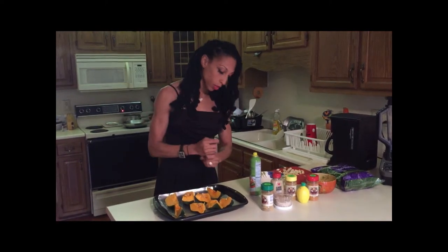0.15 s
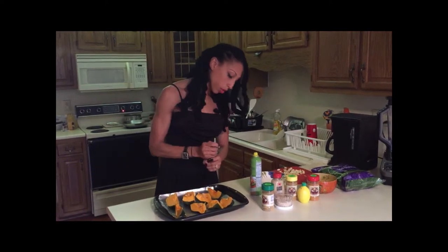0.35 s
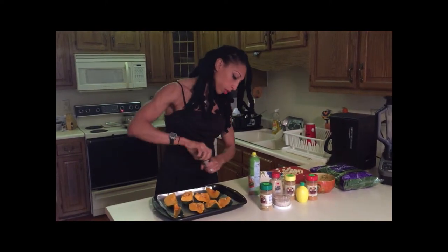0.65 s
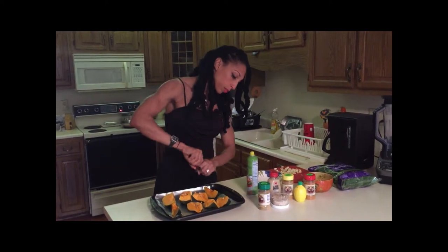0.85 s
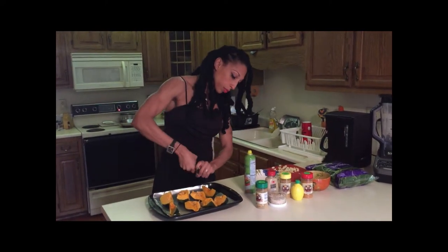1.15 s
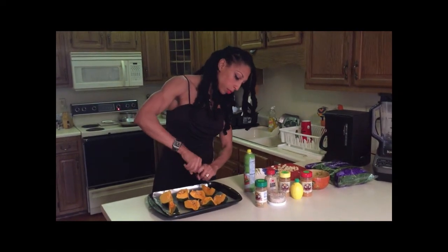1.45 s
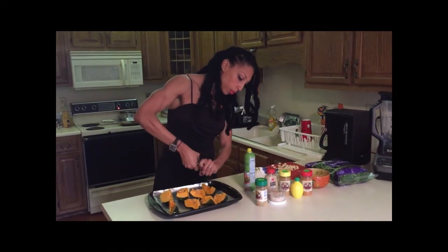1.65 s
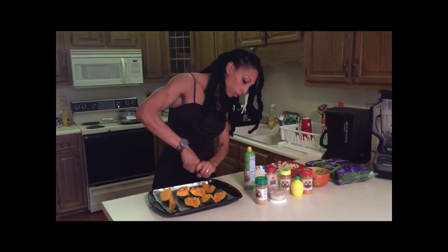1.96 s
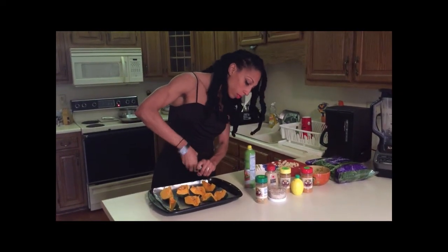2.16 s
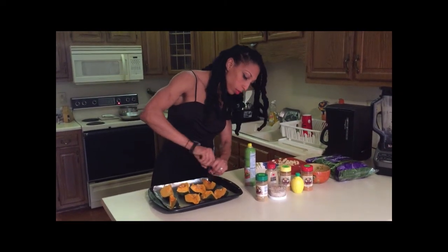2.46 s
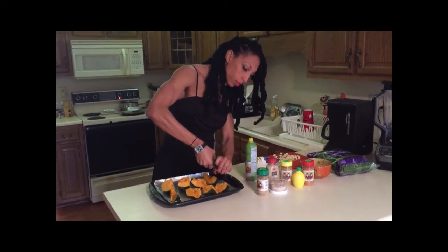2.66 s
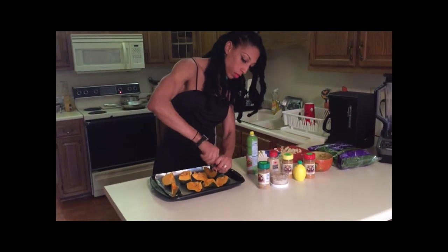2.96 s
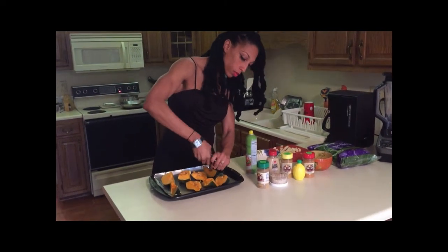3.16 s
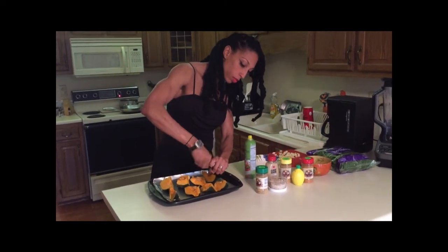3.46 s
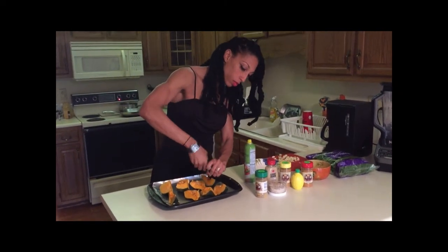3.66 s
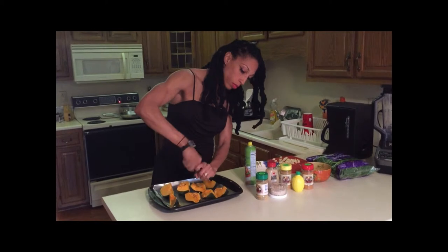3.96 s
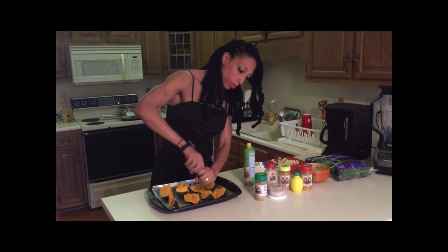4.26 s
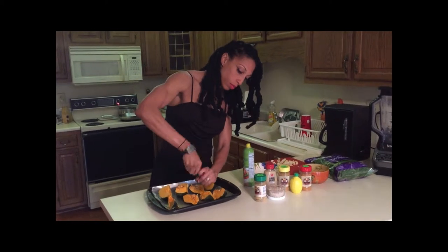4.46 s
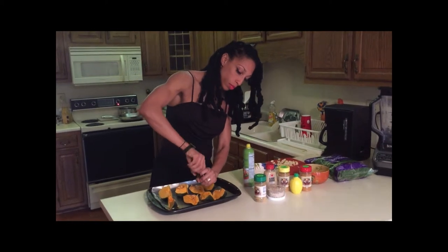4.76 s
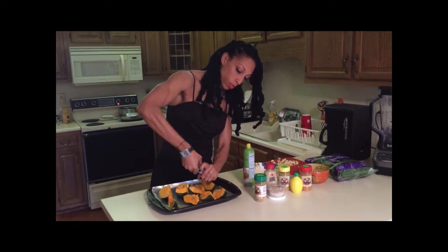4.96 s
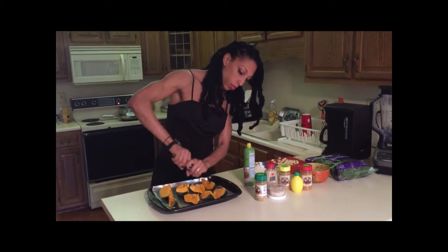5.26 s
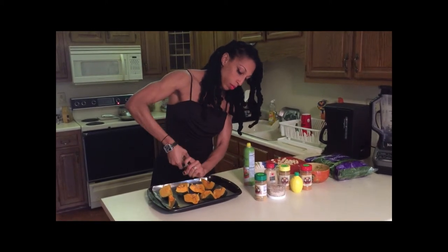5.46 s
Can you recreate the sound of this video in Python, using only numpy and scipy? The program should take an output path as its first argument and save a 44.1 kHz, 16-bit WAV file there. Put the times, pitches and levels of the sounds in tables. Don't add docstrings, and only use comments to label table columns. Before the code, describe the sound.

In a home kitchen, quiet room air and a low fridge hum come first, with faint crumb ticks and a small crackle. From about one second a pepper mill is twisted in regular jerks, each a sharp, hollow, gritty crunch. Light ticks and slips fill the gaps. The camera microphone is a couple of metres away, catching short reflections from hard surfaces.

```python
import sys
import numpy as np
from scipy import signal
from scipy.fft import rfft, irfft
from scipy.io import wavfile
from scipy.ndimage import uniform_filter1d

SR = 44100
rng = np.random.default_rng(int(sys.argv[2]) if len(sys.argv) > 2 else 0)


def to_wav(sig):
    pcm = np.clip(np.atleast_2d(sig), -1, 1) * 32767
    pcm = np.round(pcm).astype(np.int16)
    wavfile.write(sys.argv[1], SR, pcm.T)


def volts_from_decibels(level):
    exponent = np.asarray(level, float) / 20
    return 10 ** exponent


N = 246911
TIME = np.arange(N) / SR


def set_rms(x, db):
    return x * volts_from_decibels(db) / np.sqrt(np.mean(x ** 2))


def unit_energy(x):
    return x / np.sqrt(np.sum(x ** 2, axis=-1, keepdims=True))


def on_log_axis(table, hz):
    table_hz, value = np.transpose(table)
    return np.interp(np.log(np.maximum(hz, 1)), np.log(table_hz), value)


def resonance(x, hz, width_hz):
    return signal.lfilter(*signal.iirpeak(hz, hz / width_hz, fs=SR), x)


def low_cut(x, hz, order):
    return signal.sosfilt(signal.butter(order, hz, "high", fs=SR, output="sos"), x)


# frequency in Hz, level in dB per Hz before scaling.
AIR_COLOUR = [(30, -12.5), (55, -4), (100, -13.5), (250, -10), (600, -20), (1080, -24), (1900, -27),
              (15000, -40.5)]
# frequency in Hz, width in Hz, level in dB.
FRIDGE_LINES = [(112, 4, -78.5), (157.5, 18, -72), (237.6, 9.6, -81), (361.6, 32, -76), (1052, 120, -75.5)]


def air():
    hz = np.arange(N // 2 + 1) * SR / N
    colour = volts_from_decibels(on_log_axis(AIR_COLOUR, hz))
    hiss = set_rms(irfft(rfft(rng.standard_normal(N)) * colour, N), -67.5)
    treble = low_cut(hiss, 450, order=2)
    rumble = hiss - treble
    for line_hz, width_hz, db in FRIDGE_LINES:
        rumble = rumble + set_rms(resonance(rng.standard_normal(N), line_hz, width_hz), db)
    swell = set_rms(resonance(rng.standard_normal(N), 4, 6), 0)
    draught_db = 1.8
    motor = set_rms(np.sin(2 * np.pi * 238.7 * TIME), -73)
    return treble + rumble * volts_from_decibels(draught_db * swell) + motor


# start in seconds, pitch factor of the hollow,
# pitch factor of the shell, level of the tooth tips in dB as the mouth points to or from the microphone.
GRIPS = [(0, 1.046, 0.92, 1.7), (.8, 1.01, 0.99, 0), (1.55, 0.95, 1.065, -0.5), (1.95, 1.003, 0.96, -0.8),
         (2.55, 1.027, 1.064, .1), (3.08, 1.035, .98, -3), (3.5, 1.037, 1, -3.5), (4.05, 1.022, 1.006, 1),
         (4.55, 1.025, 1, -1.5), (5.0, 1.02, 1.01, 0.7), (5.46, 1.04, 0.95, -0.9)]


def grip_at(s):
    return max(np.searchsorted(np.transpose(GRIPS)[0], s) - 1, 0)


# frequency in Hz, width in Hz, level in dB.
WALL_MODES = [(947, 790, -2), (1200, 240, 0)]
HOLLOW_MODES = [(1880, 61, 0.5), (2056, 84, -2.5), (2244, 450, 1), (2504, 600, -3)]
SHELL_MODES = [(3380, 280, -11), (3674, 490, -0.5), (4020, 420, -6), (4310, 380, -8.5)]
BURR_MODES = [(6450, 540, -2.5), (6940, 900, -3.5), (8070, 1400, -5.5)]
TEETH_MODES = [(9830, 1200, 0), (11180, 1600, 0.0019), (13400, 2500, 0.015)]
CORNERS = [760, 1640, 2600, 5300, 8600]
WALL, HOLLOW, SHELL, BURR, TEETH = range(5)
STILL = np.zeros(8)


def ring(part, chance, tune=(1, 1)):
    detune, balance_db = 0.03, 2.0
    t = np.arange(512) / SR
    modes = (WALL_MODES, HOLLOW_MODES, SHELL_MODES, BURR_MODES, TEETH_MODES)[part]
    hz, width, db = np.transpose(modes)[:, :, None]
    count = len(hz)
    pitch = (1, *tune, 1, 1)[part]
    hz = hz * pitch * (1 + detune * chance[:count, None])
    size = volts_from_decibels(db + balance_db * chance[count:2 * count, None]) * np.sqrt(width)
    sound = np.sum(size * np.exp(-np.pi * width * t) * np.sin(2 * np.pi * hz * t), axis=0)
    return unit_energy(low_cut(sound, CORNERS[part] * pitch, order=3 if part == WALL else 6))


# start in seconds, level at the burr in dB, shell over burr in dB.
CRUMB_TICKS = [(0.0964, -67.5, -1), (.2813, -69, -14), (1.3657, -62, -10), (1.398, -51.5, -9),
               (1.472, -56.5, -11.5), (1.63, -62, 6.5), (1.8753, -52.5, -4), (1.9923, -51, -15),
               (1.9973, -46.5, -21), (2.4179, -52, -23.5), (2.4283, -53.5, -12), (2.4363, -56.5, -1.5),
               (2.4757, -52, -18), (2.8693, -49.5, -16), (2.975, -63, -14), (2.9792, -64.5, -13),
               (3.037, -63, -16), (3.1103, -63, 11), (3.3293, -64, 13), (3.4922, -63.5, -12),
               (3.585, -71, 10), (3.808, -54, 0), (4.5052, -66.5, -9), (4.587, -61, 9.5),
               (4.8265, -54, -11.5), (4.9651, -68, -20.5), (5.2554, -57, -5.5), (5.275, -69, -11.5),
               (5.4068, -66, -14.5), (5.44, -56.5, -23.5)]
# start in seconds, level in dB, # depth in dB (deep in the
MORE_BREAKS = [(0.2975, -51.5, -1), (0.328, -56.5, -15), (.4102, -48, -2), (1.0748, -50, -17),
               (1.0951, -32, -1.5), (1.1619, -41, 11), (1.186, -35.5, 4), (1.1934, -40, -12),
               (1.6681, -29, -0.5), (1.6917, -56, -4), (2.0816, -46, -4), (2.0956, -40.5, -2),
               (2.1598, -41, -1), (2.1855, -38, 1.5), (2.6614, -40, -6.5), (2.7397, -41.5, 5.5),
               (3.1519, -40, 2.5), (3.1652, -35.5, 7), (3.6069, -40.5, 7.5), (3.6763, -37.5, -1.5),
               (4.1233, -48, 6), (4.1648, -35, -0.5), (4.187, -37, -4), (4.5966, -44, 4.5),
               (4.7002, -38, -0.5), (5.0467, -39, 4), (5.1071, -40, -2.5), (5.4869, -45.5, -5),
               (5.5421, -47, 7), (5.5787, -43.5, -1)]
# start in seconds, level at the shell in dB, # hollow over
# shell in dB, burr over shell in dB.
CORN_BREAKS = [(0.3201, -36.5, -7, -20), (.3354, -39.5, 2, 1.5), (1.0816, -23.5, -9.5, -5),
               (1.0993, -26.5, -3, -3.5), (1.1586, -30.5, 0.5, -1.5), (1.1825, -26, -14, -6.5),
               (1.6567, -30, -7, -6), (1.6631, -29.5, 1, 2.5), (2.11, -32, -2, -9.5),
               (2.1207, -30.5, -8, -3.5), (2.1752, -33.5, -4, -0.5), (2.6484, -26.5, -2, -6),
               (2.693, -29, -11, -11.5), (2.718, -17.5, -12, -6), (3.1233, -40, -3.5, 0),
               (3.162, -30.5, -3.5, -0.5), (3.198, -31, -3, -4.5), (3.5904, -41.5, -11, -9),
               (3.6203, -33, 0.5, -8), (3.6515, -25.5, -1.5, -3), (3.6545, -38, 12, 5),
               (4.145, -31.5, -4, -1.5), (4.1691, -34.5, -16, 0.5), (4.2184, -37.5, -6, 7),
               (4.6129, -35.5, 3.5, 5), (4.687, -46.5, 8.5, 10.5), (5.0525, -36.5, -1, 0.5),
               (5.134, -33, -2.5, 0.5), (5.5091, -48, 11.5, 11.5), (5.5123, -32.5, -21, -17)]
# start in seconds, level at the wall in dB.
WALL_JOLTS = [
    (1.1827, -55),
    (1.6622, -43),
    (2.1191, -44.5),
    (2.718, -40.5),
    (3.6508, -38),
    (4.1693, -42),
    (4.6137, -45),
    (5.1347, -54),
]


def strikes():
    wall_db, teeth_db = -17, -6
    silent = -np.inf
    rows = []
    for s, shell, hollow_over, burr_over in CORN_BREAKS:
        hollow, burr = shell + hollow_over, shell + burr_over
        rows.append((s, hollow + wall_db, hollow, shell, burr, burr + teeth_db))
    for s, shell, depth in MORE_BREAKS:
        hollow, burr = shell - 1.5 + depth, shell - 3.5 - depth
        rows.append((s, hollow + wall_db, hollow, shell, burr, burr + teeth_db))
    for s, wall in WALL_JOLTS:
        rows.append((s, wall, silent, silent, silent, silent))
    for s, burr, shell_over in CRUMB_TICKS:
        rows.append((s, silent, silent, burr + shell_over, burr, burr - 7))
    return rows


SPLINTER_DECAY = [.0008, .0012, .0005, .0011, .0013]


def cracks():
    spot_db = 2.5 * np.array([1, 0, 0, 0, 1])
    ring_db = np.array([16.35, 17.17, 17.1, 17.5, 22.05])
    fade = np.exp(-np.arange(256) / SR / np.array(SPLINTER_DECAY)[:, None])
    even = [np.array([ring(part, STILL, tune) for part in range(5)]) for _, *tune, _ in GRIPS]
    direct, spread = np.zeros((2, N + 1024))
    for s, *part_db in strikes():
        luck = rng.standard_normal((5, 9))
        splinters = unit_energy(rng.standard_normal((5, 256)) ** 3 * fade)
        grip = grip_at(s)
        _, *tune, teeth_db = GRIPS[grip]
        gains = volts_from_decibels(np.array(part_db) + spot_db * luck[:, -1] + ring_db)
        gains[TEETH] *= volts_from_decibels(teeth_db)
        i = int(s * SR)
        for part in range(5):
            direct[i:i + 767] += gains[part] * np.convolve(splinters[part], ring(part, luck[part], tune))
        spread[i:i + 512] += gains @ even[grip]
    return direct[:N], spread[:N]


# start in seconds, end in seconds,
# load at the hollow in dB, shell and burr over hollow in dB.
WRIST_PUSHES = [(.3, 0.366, -54, -14), (1.073, 1.136, -54, 3.5), (1.15, 1.261, -46, -6.5),
                (1.652, 1.73, -44, -1), (2.079, 2.223, -46.5, -6), (2.647, 2.696, -44.5, -2.5),
                (2.714, 2.787, -46, -7), (3.123, 3.18, -53, -1), (3.17, 3.244, -49, -7),
                (3.58, 3.63, -53.5, -1.5), (3.67, 3.724, -48.5, -5.5), (4.12, 4.156, -59.5, 4),
                (4.145, 4.218, -41.5, -10.5), (4.585, 4.638, -54, 1), (4.661, 4.715, -48.5, -4),
                (5.045, 5.15, -49, -4.5), (5.481, 5.66, -58, 2.5)]
# start in seconds, end in seconds, level at the burr in dB.
BACK_SLIPS = [
    (.36, 0.426, -78),
    (1.379, 1.52, -73),
    (1.607, 1.653, -68.5),
    (1.986, 2.08, -74),
    (2.396, 2.52, -74.5),
    (2.895, 3.045, -69),
    (3.8, 3.827, -68),
    (4.8, 4.837, -91),
    (5.238, 5.3, -66.5),
]


def strokes():
    pushes = [(a, b, db, db + top_db + 1.5, db + top_db) for a, b, db, top_db in WRIST_PUSHES]
    slips = [(a, b, db - 13, db - 4.5, db) for a, b, db in BACK_SLIPS]
    return pushes + slips


def grit():
    clicks_per_s, patchy_db, patch = 1000, 3.0, int(0.006 * SR)
    size_db = np.minimum(4.5 * rng.exponential(size=N), 15)
    happens = rng.random(N) < clicks_per_s / SR
    clicks = set_rms(happens * volts_from_decibels(size_db) * rng.choice([-1, 1], N), 0)
    wander = np.repeat(rng.standard_normal((3, N // patch + 1)), patch, axis=1)[:, :N]
    clicks = clicks * volts_from_decibels(patchy_db * wander)
    breaks = np.transpose(strikes())[0]
    out = np.zeros(N + 512)
    for start, end, *part_db in strokes():
        nearest = breaks[np.argmin(abs(breaks - start))]
        if abs(nearest - start) < 0.012:
            start = nearest
        span = slice(int(start * SR), int(end * SR))
        rise = (TIME[span] - start) / 0.009
        fall = (end - TIME[span]) / (0.38 * (end - start))
        push = np.clip(np.minimum(rise, fall), 0, 1)
        _, *tune, teeth_db = GRIPS[grip_at(start)]
        mouth = ring(BURR, STILL) + volts_from_decibels(1.5 + teeth_db) * ring(TEETH, STILL)
        bodies = np.array([ring(HOLLOW, STILL, tune), ring(SHELL, STILL, tune), mouth])
        sound = volts_from_decibels(part_db) @ signal.fftconvolve(push * clicks[:, span], bodies, axes=1)
        out[span.start:span.start + len(sound)] += sound
    return out[:N]


# delay in seconds, level in dB.
FIRST_ECHOES = [(.0035, -6.5), (.0072, -11), (0.0109, -10.5), (0.0138, -19.5), (.0215, -8.5)]


def echoes(x):
    dull = signal.lfilter(*signal.butter(2, 5500, fs=SR), x)
    out = x
    for delay, db in FIRST_ECHOES:
        out = out + volts_from_decibels(db) * np.r_[np.zeros(int(delay * SR)), dull][:N]
    return out


# frequency in Hz, time to fall 60 dB in seconds.
TAIL_TIMES = [(1000, 0.2), (2100, 0.45), (4000, 0.4), (7000, 0.45), (14000, 0.24)]
# frequency in Hz, tail energy over direct in dB.
TAIL_LEVELS = [(1000, 0.5), (1900, 0), (3300, 6.5), (4300, -10.5), (7000, -0.5), (14000, -1.5)]


def tail_response():
    t = np.arange(SR // 2) / SR
    onset = 1 - np.exp(-(t / 0.0013) ** 2)
    response = 0
    for hz in 700 * 2 ** np.arange(0, 4.6, 0.5):
        noise = resonance(rng.standard_normal(len(t)), hz, hz / 3)
        fall_db = 60 * t / on_log_axis(TAIL_TIMES, hz) + 12 * (t / 0.41) ** 4
        tail = unit_energy(noise * volts_from_decibels(-fall_db) * onset)
        response = response + tail * np.sqrt(hz / SR) * volts_from_decibels(on_log_axis(TAIL_LEVELS, hz))
    return response


def kitchen(x):
    out = np.zeros(N + SR)
    stay = int(0.56 * SR)
    for i in range(0, N, stay):
        piece = signal.fftconvolve(x[i:i + stay], tail_response())
        out[i:i + len(piece)] += piece
    return out[:N]


def hush(tail):
    floor_db = -68.5
    power = np.maximum(uniform_filter1d(tail ** 2, size=900), 0)
    return tail * power / (power + volts_from_decibels(floor_db) ** 2)


# centre in seconds, frequency in Hz, level in dB, half length in seconds.
LOW_PUFFS = [
    (.682, 55, -58, 0.012),
    (2.302, 86, -53.5, 0.013),
    (2.666, 60, -61, 0.021),
    (3.692, 55, -58.5, 0.011),
    (4.082, 55.8, -60, 0.017),
    (4.698, 80, -54.5, 0.01),
    (4.842, 98, -48, 0.0047),
    (5.116, 54.6, -58.5, 0.019),
    (5.306, 56.6, -51, 0.019),
]


def puffs():
    out = np.zeros(N)
    for s, hz, db, half in LOW_PUFFS:
        t = np.clip(TIME - s, -4 * half, 4 * half)
        puff = np.exp(-(t / half) ** 2)
        out += volts_from_decibels(db) * puff * np.sin(2 * np.pi * hz * t * (1 - 0.12 * t / half))
    return out


def scene():
    direct, spread = cracks()
    grating = grit()
    mill = echoes(direct + grating)
    room = hush(kitchen(spread + grating))
    return (air() + mill + room + puffs())[None]


def band_limit(x):
    return signal.sosfilt(signal.butter(12, 16500, fs=SR, output="sos"), x)


def record(dry):
    top_cut = signal.ellip(8, 0.3, 39, 15300, fs=SR, output="sos")
    heard = signal.sosfilt(top_cut, dry)
    heard = heard - 0.32 * resonance(heard, 5025, 620)
    return band_limit(low_cut(heard, 40, order=3))


dry = scene()
out = record(dry)
to_wav(out)
```